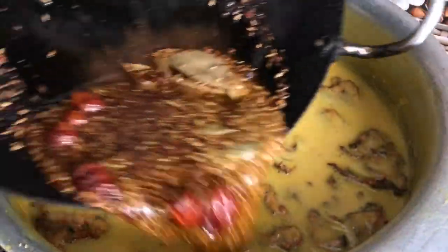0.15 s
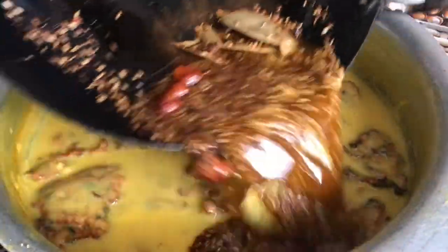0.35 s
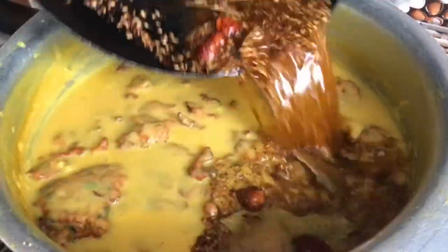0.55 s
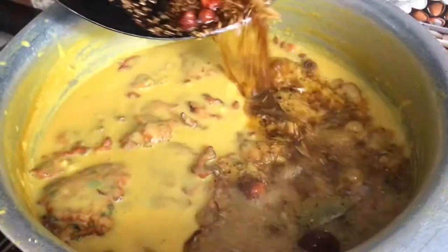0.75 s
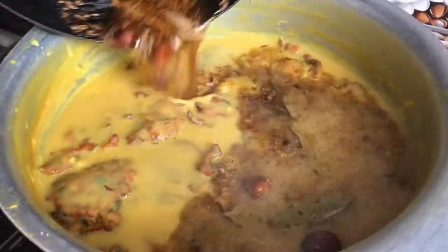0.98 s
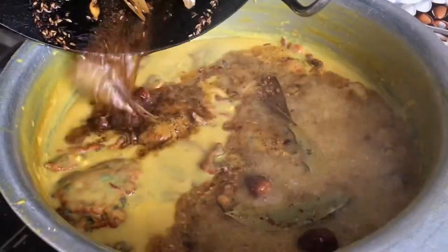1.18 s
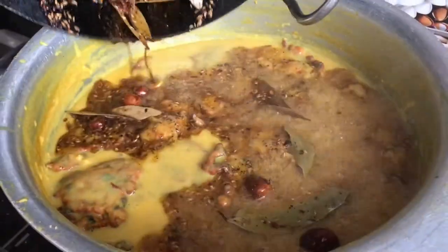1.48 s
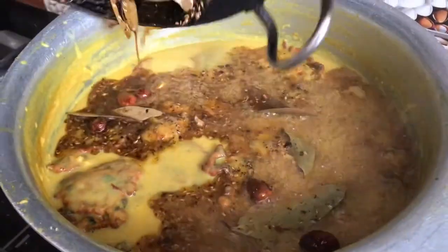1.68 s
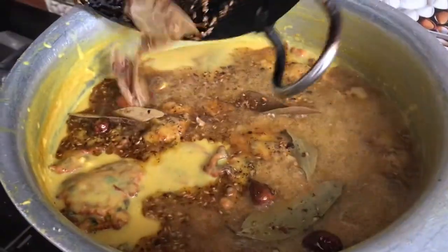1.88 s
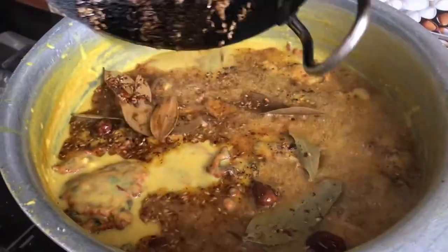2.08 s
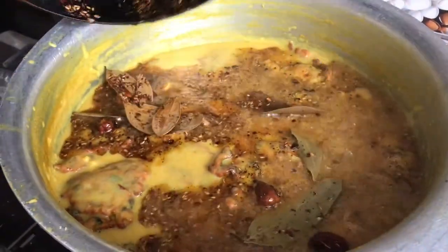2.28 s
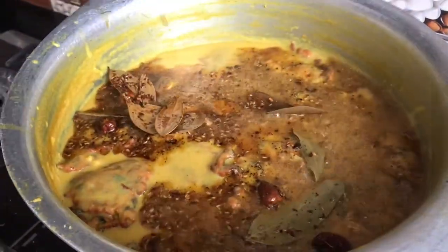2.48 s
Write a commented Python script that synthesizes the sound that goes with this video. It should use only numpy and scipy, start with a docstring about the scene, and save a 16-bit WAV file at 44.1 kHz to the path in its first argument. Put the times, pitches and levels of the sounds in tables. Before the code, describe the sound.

Hot oil hits wet curry with a few spits, then a dense, bright, sustained sizzling hiss

```python
"""A kitchen fan hums and rumbles from the start, with a faint steady treble hiss, to the end.
A few drops spit first, each a click and a puff of noise, as hot spiced oil is tipped into a wide
metal pot of wet food. Then tens of thousands of steam bubbles burst each second as short random
resonances and ring in the pot wall. Later come low tones, decaying sines that swell briefly and
fade. A mono phone microphone above the pot hears it all."""
import sys
import numpy as np
from scipy import signal
from scipy.fft import rfft, irfft
from scipy.io import wavfile
from scipy.ndimage import uniform_filter1d

SR = 44100
rng = np.random.default_rng(int(sys.argv[2]) if len(sys.argv) > 2 else 0)


def wav_record(signal):
    """Record a signal, one row per channel, as 16-bit PCM in the file named by sys.argv[1]."""
    frames = np.transpose(np.atleast_2d(signal))
    bounded = np.clip(frames, -1, 1)
    # unit amplitude maps onto the largest positive 16-bit level
    quanta = np.round(bounded * 32767).astype(np.int16)
    wavfile.write(sys.argv[1], SR, quanta)


N = 116865


def undb(db):
    """Decibel law: a level in dB becomes an amplitude factor."""
    return 10 ** (np.asarray(db) / 20)


def unit(x):
    """Energy normalisation: scale to an RMS of 1."""
    return x / np.sqrt(np.mean(x ** 2))


def curve(table, column):
    """Linear interpolation: one column of a table as a value per sample."""
    rows = np.array(table)
    return np.interp(np.arange(N) / SR, rows[:, 0], rows[:, column])


def ring(x, hz, width_hz):
    """Damped resonance: a two-pole filter with gain 1 at its centre."""
    b, a = signal.iirpeak(hz, hz / width_hz, fs=SR)
    return signal.lfilter(b, a, x)


def colour(x, points):
    """Minimum-phase filtering: a causal filter with the gain of (Hz, dB) points."""
    size, rows = 8192, np.array(points)
    bin_hz = np.arange(1, size // 2 + 2) * SR / size
    gain_db = np.interp(np.log(bin_hz), np.log(rows[:, 0]), rows[:, 1])
    # folding the cepstrum onto positive time makes the response causal
    cepstrum = irfft(np.log(undb(gain_db)))
    cepstrum[1:size // 2] *= 2
    cepstrum[size // 2 + 1:] = 0
    response = irfft(np.exp(rfft(cepstrum)))
    return signal.fftconvolve(x, response)[:N]


def walk(rate):
    """Smoothed noise: a random wander with RMS 1, averaged twice over 1 / rate seconds."""
    k = int(SR / rate)
    smooth = uniform_filter1d(rng.standard_normal(N), k)
    return unit(uniform_filter1d(smooth, k))


# Level of the fan hum. Each row: time in seconds, RMS level in dB.
HUM_LEVEL = [(0.0, -45), (0.1, -49), (0.2, -31.5), (0.255, -46), (0.3, -34), (0.35, -35), (0.4, -44),
             (0.6, -48), (0.69, -45), (0.74, -45), (0.8, -45.5), (1.0, -43), (1.22, -45.5), (1.29, -43),
             (1.37, -46), (1.41, -38), (1.57, -50), (1.82, -39), (1.88, -45), (1.93, -41), (2.06, -46),
             (2.2, -44), (2.25, -43), (2.3, -40.5), (2.55, -42), (2.65, -53)]
HUM_HZ, HUM_FILTER_WIDTH_HZ = 98, 26
HUM_ROUGHNESS = .5  # narrow noise relative to the pure tone, by RMS


def fan_hum():
    """Amplitude modulation: a tone and narrow-band noise around it, under a wavering level curve."""
    tone = np.sqrt(2) * np.sin(2 * np.pi * HUM_HZ * np.arange(N) / SR)
    noise = ring(rng.standard_normal(N), HUM_HZ, HUM_FILTER_WIDTH_HZ)
    blur = unit(ring(noise, HUM_HZ, HUM_FILTER_WIDTH_HZ))
    return unit(tone + HUM_ROUGHNESS * blur) * undb(curve(HUM_LEVEL, column=1))


# Spectrum of the kitchen air. Each row: frequency in Hz, relative gain in dB.
AIR_COLOUR = [(25, -55), (50, -13), (75, -6), (120, 0), (135, -6.5), (160, 1), (190, -0.5), (230, -11.5),
              (310, -5), (420, -9.5), (600, -12.5), (730, -10.5), (850, -14.5), (1100, -14.5),
              (1800, -21.5)]
AIR_DB, AIR_SWAY_DB, AIR_SWAY_PER_S = -42, .4, 8


def fan_rumble():
    """Filtered noise: random noise, strongest in the bass, sways slightly in level."""
    noise = rng.standard_normal(N)
    air = unit(colour(noise, AIR_COLOUR + [(6000, -47)]))
    return air * undb(AIR_DB + AIR_SWAY_DB * walk(AIR_SWAY_PER_S))


# Spectrum of the treble hiss. Each row: frequency in Hz, relative gain in dB.
HISS_COLOUR = [(1500, -12), (3000, 4.5), (7000, 0.5), (10500, -3), (12500, 1), (15600, -9)]
HISS_DB, HISS_PER_S = -49, 9000


def treble_hiss():
    """Shot noise: random ticks of random strength merge into a faint steady treble hiss."""
    ticks = (rng.random(N) < HISS_PER_S / SR) * rng.standard_normal(N)
    return unit(colour(ticks, HISS_COLOUR)) * undb(HISS_DB)


# Single drops. Each row: start in seconds, peak level in dB, pitch in Hz, width in Hz of each
# of two filters, time in seconds for the driving noise to fall 60 dB.
DROPS = [(0.0034, -25, 12300, 6000, 0.022), (0.0094, -25, 7600, 4030, 0.027),
         (0.015, -25, 10000, 4000, .03), (0.0324, -37, 12500, 2500, .015), (0.049, -35, 13500, 5000, .015),
         (0.0578, -32, 13000, 9000, .01), (0.0692, -28.5, 3940, 1300, 0.035), (0.0692, -35, 5530, 700, .05),
         (0.0744, -30.5, 9400, 4000, 0.021), (0.0824, -36, 12000, 5000, .02),
         (0.1082, -33, 13500, 6000, .005), (0.1164, -34, 13000, 6900, .004),
         (0.1424, -26, 12000, 12000, .005), (0.1713, -26, 6900, 810, 0.037), (0.1713, -32, 4560, 1500, .05),
         (0.172, -29, 13000, 5000, .008), (0.19, -21, 6540, 3000, 0.027), (0.191, -33, 3800, 1500, .03),
         (0.2024, -27, 10000, 2000, .03), (0.215, -34, 3440, 400, .2), (0.215, -27, 5970, 1200, 0.066),
         (0.2324, -26.5, 3100, 1200, 0.032), (0.245, -38, 3500, 600, .1), (0.265, -19, 8300, 2500, 0.043),
         (0.2934, -14.5, 4500, 3500, .02), (0.304, -29, 1760, 120, .1), (0.342, -10, 6860, 1500, .1)]
CLICK = 1.26  # strength of the first click against the noise, before the width is allowed for


def spits():
    """Impulse and decaying noise: a drop flashes to steam with a click and a puff at one pitch."""
    t = np.arange(4096) / SR
    out = np.zeros(N + len(t))
    for start_s, db, hz, width_hz, t60 in DROPS:
        noise = rng.standard_normal(len(t)) * undb(-60 * t / t60)
        # a narrower filter passes less of a click, so the click is made stronger
        click = (t == 0) * CLICK * np.sqrt(SR / 2 / width_hz)
        puff = ring(ring(noise + click, hz, width_hz), hz, width_hz)
        first = int(start_s * SR)
        out[first:first + len(t)] += undb(db) * puff / np.abs(puff).max()
    return out[:N]


# Sizzle before seething and wall rings. Each row: time in seconds, level in dB of large, medium,
# small and finest bubbles.
SIZZLE_LEVEL = [(0.17, -62, -62, -56, -52), (0.2, -68, -61, -44, -41), (0.23, -61, -55, -44, -31),
                (0.27, -58, -42.5, -28.5, -26.5), (0.31, -48, -30, -22.5, -21.5),
                (0.35, -38, -32, -22, -20.5), (0.4, -36, -26, -20, -21.5), (0.5, -32.5, -25.5, -19.5, -21),
                (0.62, -34, -25, -18, -19.5), (0.75, -32, -23.5, -17, -19), (0.9, -33.5, -23, -16.5, -18.5),
                (1.1, -34, -24, -17.5, -18.5), (1.35, -33.5, -25, -17.5, -19), (1.6, -34, -26, -18.5, -19),
                (1.9, -35, -27, -19, -19.5), (2.2, -37, -28, -20, -20), (2.45, -36.5, -28.5, -20.5, -20),
                (2.65, -39, -27, -20.5, -21.5)]
# Bubble sizes, large to finest. Each row: lowest and highest pitch in Hz, bursts per second at
# each pitch once dense, size scatter in dB, width of the first filter as a share of the pitch.
BUBBLE_SIZES = [(420, 1290, 250, 2, 0.097), (1300, 3130, 450, 2, 0.084), (3000, 7800, 1300, 1.5, 0.13),
                (7630, 17900, 2300, 2, .2)]
# Colour of pot and microphone. Each row: frequency in Hz, relative gain in dB.
POT_COLOUR = [(240, -44), (400, -16), (614, -15), (720, -12.5), (860, -10), (1020, -3), (1150, -9.5),
              (1410, -4.5), (1820, -4.5), (2260, -2), (2480, -2.5), (2720, 0), (2950, -2.5), (3600, 0),
              (4500, 0.5), (5000, -2), (5300, 1), (6300, -0.5), (7100, -2.5), (7650, -6.5), (8440, -5),
              (9900, -9.5), (10500, -14), (11200, -9.5), (12800, -8), (14700, -11), (15600, -12)]
SEETHE_DB, SEETHE_PER_S = .25, 45  # level wander shared by all bubbles
FLICKER_DB, FLICKER_PER_S = .55, 90  # level wander of each pitch alone
SPARSE, DENSE_S = .14, .36  # share of the bursts at first contact, time the boil is dense
BIGGEST = .996  # share of bubbles under the largest size


def steam_bubbles():
    """Random impulses into resonators: bubbles burst and ring briefly as the pot seethes."""
    out = 0
    seethe_db = SEETHE_DB * walk(SEETHE_PER_S)
    density = np.interp(np.arange(N) / SR, [SIZZLE_LEVEL[0][0], DENSE_S], [SPARSE, 1])
    for k, (low_hz, high_hz, rate, scatter_db, width) in enumerate(BUBBLE_SIZES):
        group = 0
        for hz in np.geomspace(low_hz, high_hz, num=29)[1::2]:  # 14 pitches
            when, size, sign = rng.random((3, N))
            burst = when < density * rate / SR
            strength = undb(-scatter_db * np.log(1 - BIGGEST * size)) * np.sign(sign - .5)
            # sparse bursts are stronger, so the mean power holds
            bursts = burst * strength / np.sqrt(density)
            rung = ring(ring(bursts, hz, width * hz), hz, 2 * width * hz)
            flicker = undb(FLICKER_DB * walk(FLICKER_PER_S))
            group = group + unit(rung) * np.sqrt(hz) * flicker
        level_db = curve(SIZZLE_LEVEL, column=k + 1) + seethe_db
        out = out + unit(colour(group, POT_COLOUR)) * undb(level_db)
    return out


# Rings of the pot wall. Each row: pitch in Hz, width in Hz, gain in dB relative to the bubbles.
WALL_RINGS = [(870, 49, -6.5), (1003, 29, -27.5), (1450, 78, -5), (1606, 26, -7.5), (1760, 16, -5.5),
              (2185, 28, -5.5), (2320, 18, -1), (2660, 19, -17), (3100, 27, -4.5), (3394, 28, 1),
              (3560, 25, -5), (4020, 37, -7), (5930, 45, -10), (6900, 48, -11)]


def pot_wall(bubbles):
    """Modal resonance: the bubbles drive narrow modes of the metal, added to their sound."""
    return bubbles + sum(undb(db) * ring(bubbles, hz, width_hz) for hz, width_hz, db in WALL_RINGS)


ONSET_S = 0.038


def sizzle():
    """Superposition: bubbles and wall sound together, faded in linearly at first contact."""
    since_contact_s = np.arange(N) / SR - SIZZLE_LEVEL[0][0]
    return pot_wall(steam_bubbles()) * np.clip(since_contact_s / ONSET_S, 0, 1)


# Low tones. Each row: start in seconds, level in dB from which the decay starts (before the
# rise), pitch in Hz, time in seconds to fall 60 dB.
LOW_TONES = [(1.14, -34.5, 181, 0.23), (1.451, -40.5, 420, 0.71), (1.572, -30.5, 168, 0.17),
             (1.771, -40, 420, 0.48), (1.981, -36.5, 126, 0.95), (2.09, -34.5, 301, 0.15),
             (2.48, -37.5, 155, 0.79), (2.53, -35, 524, 0.22)]
TONE_RISE_S = 0.016


def low_tones():
    """Damped oscillation: low tones swell briefly and fade, each on one pitch."""
    out = 0
    for start_s, db, hz, t60 in LOW_TONES:
        t = np.maximum(np.arange(N) / SR - start_s, 0)
        swell = np.minimum(t / TONE_RISE_S, 1)
        out = out + swell * undb(db - 60 * t / t60) * np.sin(2 * np.pi * hz * t)
    return out


def scene():
    """Linear superposition: all sources add at one microphone, which feeds both channels."""
    background = fan_hum() + fan_rumble() + treble_hiss()
    mono = background + spits() + sizzle() + low_tones()
    return np.array([mono, mono])


TOP_HZ = 15730


def record(dry):
    """Band limiting: the phone cuts the top with a steep elliptic low-pass, applied twice."""
    cut = signal.ellip(11, .3, 62, TOP_HZ, fs=SR, output="sos")  # ripple and stopband in dB
    return signal.sosfilt(np.vstack([cut, cut]), dry)


dry = scene()
out = record(dry)
wav_record(out)
```